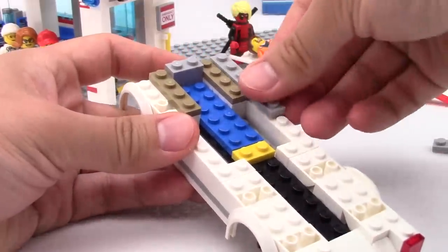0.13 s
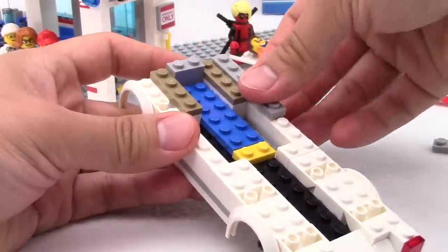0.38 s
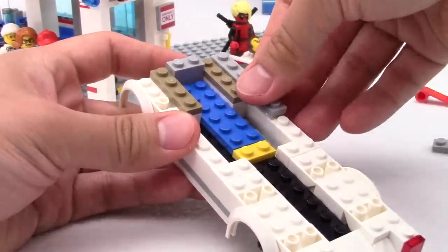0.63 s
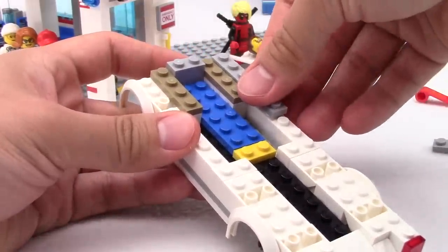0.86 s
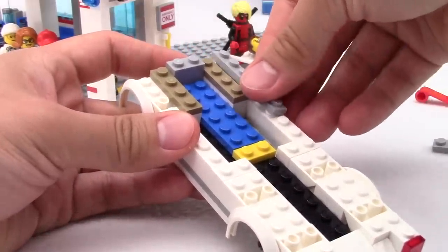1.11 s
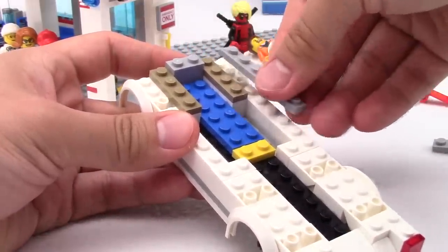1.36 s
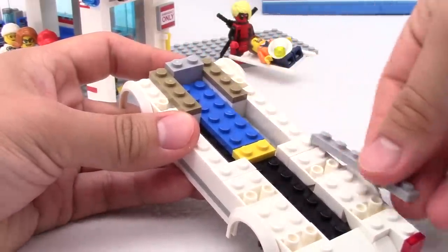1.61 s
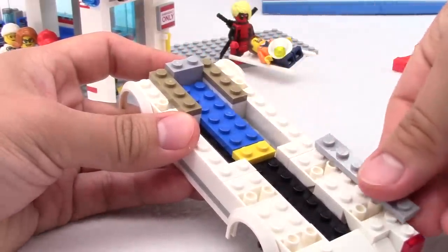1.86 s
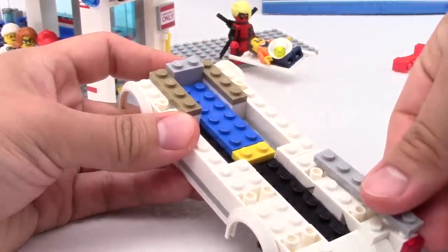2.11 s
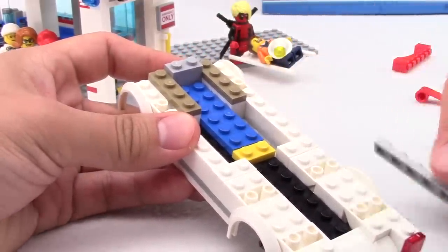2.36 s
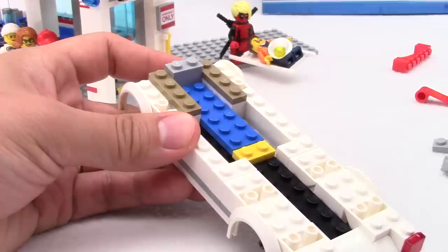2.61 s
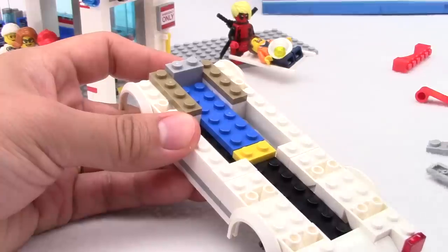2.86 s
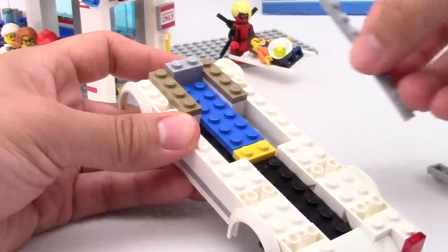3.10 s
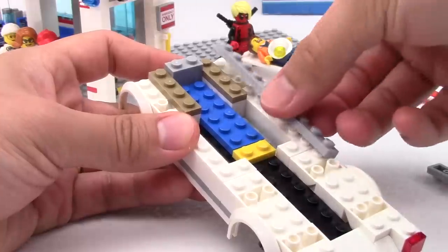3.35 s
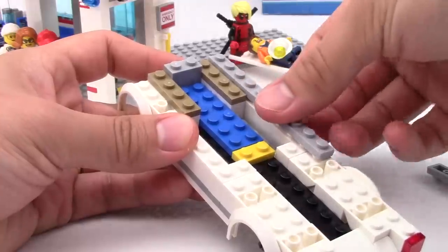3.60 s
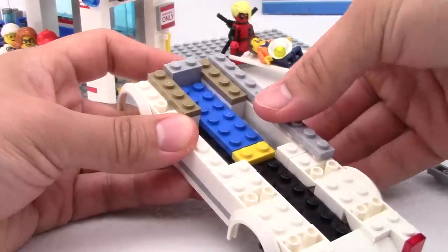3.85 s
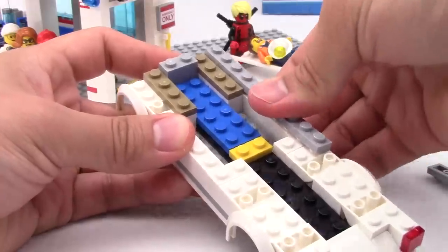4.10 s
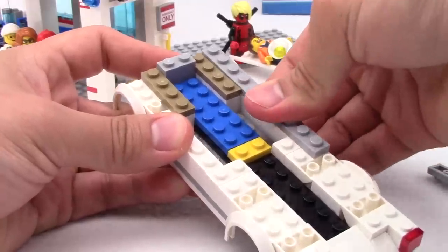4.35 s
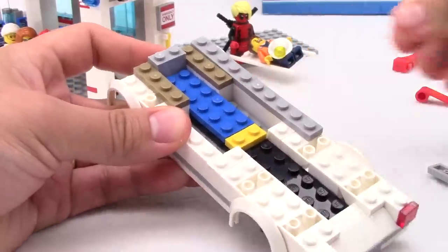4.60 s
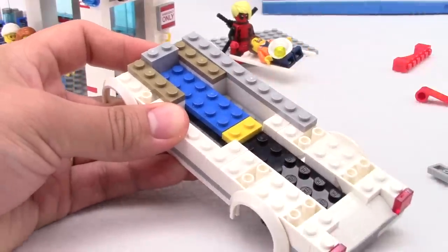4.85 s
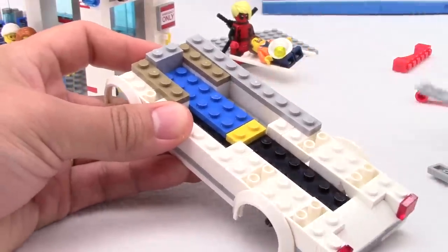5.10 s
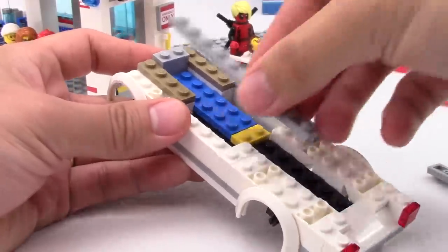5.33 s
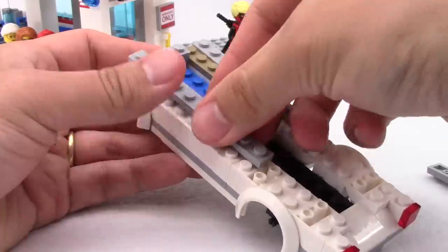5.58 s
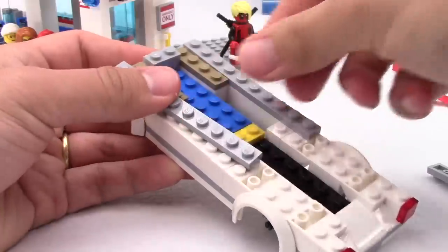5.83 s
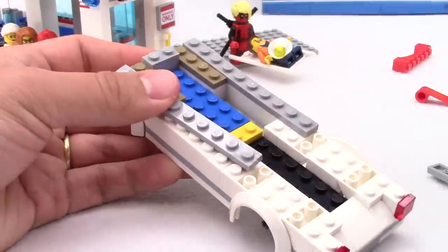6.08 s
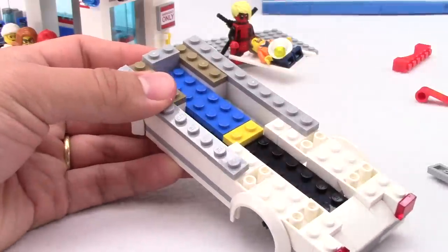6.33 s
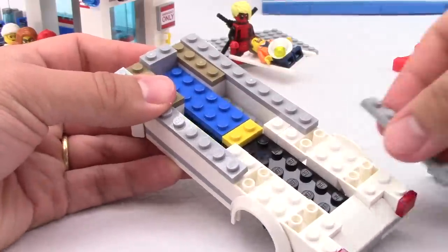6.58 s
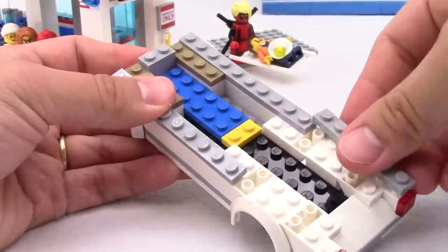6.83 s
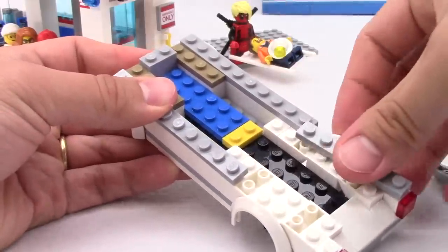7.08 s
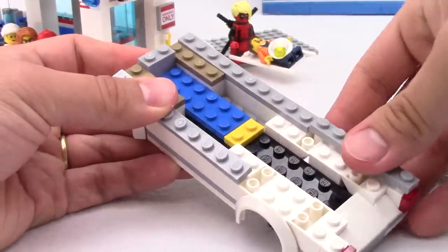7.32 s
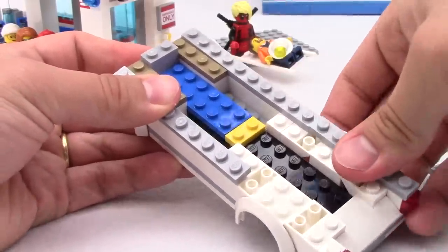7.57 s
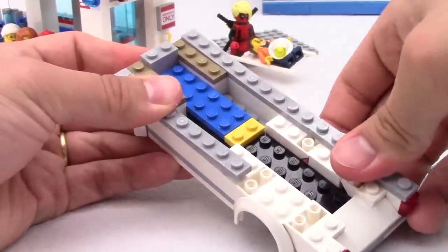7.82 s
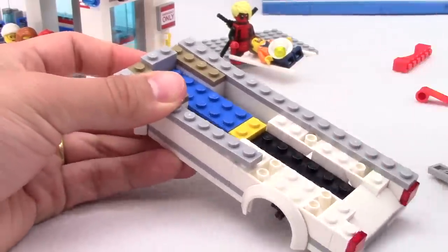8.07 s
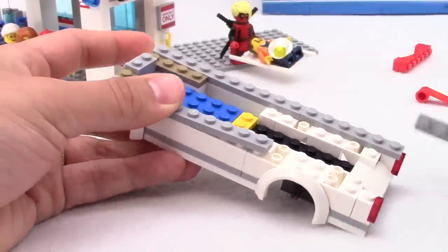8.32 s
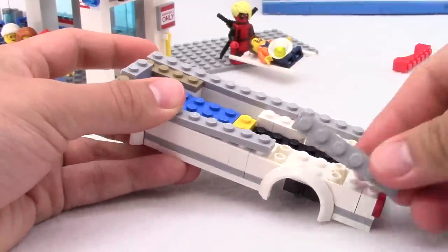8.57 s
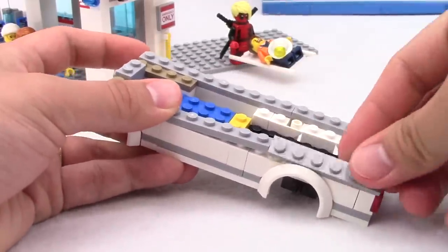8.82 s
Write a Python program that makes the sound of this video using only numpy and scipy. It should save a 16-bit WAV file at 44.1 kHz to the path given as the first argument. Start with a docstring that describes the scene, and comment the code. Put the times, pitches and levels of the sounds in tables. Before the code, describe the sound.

Close up in a quiet small room, fingers handle hard plastic toy bricks. Faint ticks and tiny scrapes come first, then a crisp snap, a louder one soon after, and a long near-silence. Later another bright snap, then a very sharp click followed by a heavier double press with a low woody thump from the table. Faint handling ends it. Low rumble and slight hiss lie underneath.

```python
"""Plastic toy bricks and plates are picked up, placed and pressed onto a model held over a table in a quiet room.
Each contact is a burst of tiny stud slips ringing the modes of the hollow plastic; some plates sing a short note.
Pushes swing softly and knock the modes of the table top, and brushing fingers are clumped grains of noise.
The room answers with a short noise tail, over low rumble and hiss made of coloured noise."""
import sys
import numpy as np
from scipy import signal
from scipy.fft import rfft, irfft
from scipy.io import wavfile
from scipy.ndimage import uniform_filter1d

SR = 44100
rng = np.random.default_rng(int(sys.argv[2]) if len(sys.argv) > 2 else 0)


def to_linear_factor(level_db):
    """Convert decibel levels (scalar or array-like) to linear amplitude factors."""
    exponent = np.asarray(level_db, float) / 20
    return 10 ** exponent


def dump(signal):
    """Clip the signal to [-1, 1] and save it as 16-bit WAV at the path in sys.argv[1]."""
    limited = np.clip(np.atleast_2d(signal).T, -1, 1)
    pcm = np.round(limited * 32767).astype(np.int16)
    wavfile.write(sys.argv[1], SR, pcm)


N = 394254

# Strokes of fingers over studs. Each row: start in seconds, length in seconds, rms level in dB, centre in Hz.
STROKES = [(0.222, 0.15, -74, 5500), (1.05, .065, -76, 4000), (1.558, .051, -68.5, 8000),
           (1.992, .088, -62, 6000), (2.241, 0.051, -66.5, 5900), (2.802, .13, -64.5, 5900),
           (4.517, 0.07, -58, 7990), (4.606, 0.21, -63.5, 5700), (4.996, 0.14, -64.5, 4505),
           (5.28, 0.058, -71.5, 5930), (5.697, .045, -57.5, 4000), (5.879, 0.099, -71.5, 6900),
           (6.69, 0.2, -72.5, 8100), (6.968, 0.059, -65.5, 8500), (7.947, 0.063, -61.5, 6004),
           (8.051, 0.19, -69, 6815), (8.199, .13, -59, 3800), (8.28, 0.16, -70, 4490),
           (8.601, 0.26, -69, 5000), (8.81, 0.15, -68.5, 4960)]


def in_time(rows):
    """A curve of (seconds, value) rows read at every sample."""
    return np.interp(np.arange(N) / SR, *np.transpose(rows))


def at_hz(points, hz):
    """A table of (Hz, value) rows read on a log-frequency axis."""
    points = np.array(points)
    return np.interp(np.log(hz), np.log(points[:, 0]), points[:, 1])


def rms_one(x):
    """Scales a sound to unit rms."""
    return x / np.sqrt(np.mean(x ** 2) + 1e-20)


def coloured(white, spectrum):
    """White noise shaped by a spectrum of (Hz, dB) rows, at unit rms."""
    hz = np.maximum(np.fft.rfftfreq(len(white), 1 / SR), 1)
    shaped = rfft(white) * to_linear_factor(at_hz(spectrum, hz))
    return rms_one(irfft(shaped, len(white)))


def add(out, sound, s):
    """Mixes a sound in at a time in seconds; whatever lies past the end is left out."""
    at = round(s * SR)
    out[at:at + len(sound)] += sound[:max(len(out) - at, 0)]


def low_rumble():
    """Rumble through floor and table: bass-heavy noise whose level drifts."""
    # Each row: time in seconds, rms level in dB.
    rumble_level = [(0, -59.5), (1.4, -57.5), (2.8, -58), (2.96, -54.5), (3.2, -60), (4.4, -58.5),
                    (4.68, -54), (4.9, -58.5), (6.7, -59), (7.3, -54.5), (8.6, -58), (8.94, -52)]
    # Each row: frequency in Hz, relative density in dB per Hz.
    rumble_colour = [(15, -13), (25, 8), (55, -4.5), (120, -8.5), (250, -17), (500, -26.5), (1000, -49.5)]
    return to_linear_factor(in_time(rumble_level)) * coloured(rng.standard_normal(N), rumble_colour)


def steady_hiss():
    """Hiss: steady noise with a treble that slopes gently down."""
    # Each row: frequency in Hz, relative level in dB.
    hiss_colour = [(180, -31.5), (300, -4.5), (1110, -6.5), (1310, -8), (1450, -9.5), (11400, -16),
                   (15200, -21), (16500, -41.5)]
    return to_linear_factor(-68) * coloured(rng.standard_normal(N), hiss_colour)   # rms level in dB


def room(x, first_s, early_t60):
    """Near reflections die fast; the diffuse tail dies band by band."""
    # Decay of the tail. Each row: frequency in Hz, t60 in seconds.
    room_decay = [(300, 0.61), (790, 0.67), (2090, 0.5), (5510, 0.55), (10000, .45), (14600, 0.23)]
    # Balance of the sound sent to the walls, used for the tail. Each row: frequency in Hz, relative level in dB.
    wall_colour = [(100, 2), (400, 4), (1000, -1), (2500, -2), (6000, -3.5), (10000, -4.5), (15000, -3)]
    tail_db, early_db = -19, -8.5   # energy of each part before the onset fade
    t = np.arange(SR * 3 // 4) / SR
    tail = np.zeros(len(t))
    edges = 45 * 2 ** np.arange(0, 9, .5)   # half-octave bands, Hz
    for low, high in zip(edges, edges[1:]):
        band_filter = signal.butter(2, [low, high], "band", fs=SR, output="sos")
        band = signal.sosfilt(band_filter, rng.standard_normal(len(t)))
        hz = np.sqrt(low * high)
        tail += band * to_linear_factor(at_hz(wall_colour, hz) - 60 * t / at_hz(room_decay, hz))
    early = rng.standard_normal(len(t)) * to_linear_factor(-60 * t / early_t60)
    echo = (to_linear_factor(tail_db) * rms_one(tail) + to_linear_factor(early_db) * rms_one(early)) / np.sqrt(len(t))
    onset = np.clip(t / first_s, 0, 1) ** 2
    return signal.fftconvolve(x, echo * onset)[:N]


def fingers(grain_db, below_db, above_db):
    """Skin dragging on plastic: dense, uneven grains in clumps that swell and fade around a centre frequency."""
    swing_db, grip_ms = 2, 9.3   # skin sticks and lets go: depth, and time for one grip
    out = np.zeros(N)
    for s, length, level_db, centre_hz in STROKES:
        grains = rng.standard_normal(12000) * to_linear_factor(grain_db * np.minimum(rng.exponential(1, 12000), 4))
        grips = np.arange(12000) * 1000 / SR / grip_ms
        clumps_db = swing_db * np.interp(grips, np.arange(100), rng.standard_normal(100))
        grains = (grains * to_linear_factor(clumps_db))[:round(length * SR)]
        # The spectrum falls with the square of the distance in octaves, at its own rate on each side.
        hump = [(centre_hz * 2. ** k, -(above_db if k > 0 else below_db) * k ** 2) for k in range(-5, 4)]
        swell = np.sqrt(2 * np.hanning(len(grains)))
        add(out, to_linear_factor(level_db) * coloured(grains, hump) * swell, s)
    return out


def table(rise_cycles):
    """A push is a soft, damped swing; its hard edge knocks the modes of the table top."""
    # Pushes into the table. Each row: start in seconds, peak in dB, push in Hz, gain of the knock in dB.
    pushes = [(.279, -52, 258, -82), (1.69, -52, 69.5, -59), (1.99, -44, 86, -64), (2.013, -37, 66, -50.5),
              (2.291, -47.5, 63, -83), (2.466, -38, 121, -63), (2.53, -50.5, 66, -70),
              (2.844, -30, 57.2, -53), (2.866, -31.5, 52.6, -54), (2.984, -41.5, 114, -69),
              (2.999, -44, 44.7, -76.5), (3.598, -45, 86.3, -51.5), (4.214, -24, 98.7, -37.5),
              (4.516, -46, 72, -72), (5.031, -43, 53.5, -75), (5.062, -48, 55, -71.5),
              (5.101, -54, 54.6, -75), (6.288, -43, 54.6, -67.5), (6.33, -42.5, 55, -68),
              (6.691, -46, 59, -65), (6.85, -50, 59, -62), (6.974, -46, 60, -63), (7.216, -39, 140, -36),
              (7.231, -34, 125, -44.5), (7.249, -43.5, 131, -37.5), (7.6092, -12.5, 135, -28.5),
              (7.6676, -14, 101.2, -37), (7.7, -38, 130, -49), (7.97, -43, 64, -77),
              (8.649, -42.5, 59.5, -63), (8.884, -39, 105, -73), (8.899, -46, 60, -60)]
    # Modes of the table top. Each row: frequency in Hz, mean level in dB, t60 in seconds.
    top_modes = [(44, -2.5, .4), (140, -9.5, 0.34), (193, 2.5, 0.067), (254, -5.5, 0.16), (390, 0.5, 0.063),
                 (532, -5.5, 0.075), (643, -4.5, .06), (850, -10, .05)]
    out, t = np.zeros(N), np.arange(16384) / SR
    for s, peak_db, push_hz, knock_db in pushes:
        # 82 ms at 100 Hz up to -41 dB; deeper pushes last longer, firm ones are held down and stop sooner.
        t60_ms = 82 * (100 / push_hz) ** 1.5 * to_linear_factor(-.42 * max(peak_db + 41, 0))
        rise = 1 - np.exp(-t * push_hz / rise_cycles)
        push = np.sin(2 * np.pi * push_hz * t) * to_linear_factor(-60 * t * 1000 / t60_ms) * rise
        knock = np.zeros(len(t))
        for hz, mode_db, t60 in top_modes:
            struck_db = mode_db + rng.normal(0, 2.5)   # every knock strikes the modes a little differently
            knock += to_linear_factor(struck_db - 60 * t / t60) * np.sin(2 * np.pi * hz * t)
        add(out, to_linear_factor(peak_db) * push / np.abs(push).max() + to_linear_factor(knock_db) * knock, s)
    return out


def plates(rise_ms, twin_db, twin_gap):
    """Touched plates and hollows sing: each note swells within a touch and dies, blurred by a close twin mode.
    Flat plates beam their notes: returns the sound towards the listener and towards the walls."""
    # Each row: start in seconds, frequency in Hz, peak before the twin in dB,
    # how freely the plate is held from 0 to 1, level sent to the walls relative to the listener in dB.
    sung_notes = [(1.2406, 7570, -48, 0.3, -3), (1.363, 2870, -45, 0.5, -5), (1.9884, 1086, -44, 0.3, -5),
                  (2.0117, 1180, -52, 0.1, -3), (2.07, 1870, -54, 0.5, -3), (2.332, 1905, -51, 0.46, -5),
                  (2.807, 3900, -52, 0.3, -3), (2.811, 6150, -45, .2, -3), (2.812, 1820, -53.5, .2, -3),
                  (2.862, 1400, -49, 0.1, -5), (3.5982, 3770, -17, 0, -5), (3.6, 407, -47.5, 0.9, -6.5),
                  (4.214, 194, -26.5, 0.81, -4.5), (4.2159, 6030, -14.5, 0, 0.5),
                  (4.218, 529, -30.5, 0.9, -4), (5.6856, 2760, -54, .2, -3),
                  (5.7136, 1030, -43.5, 0.01, -4), (5.722, 3000, -55.5, 0.7, 3),
                  (5.8872, 2810, -55.5, 0, -4.5), (6.279, 2330, -39.5, 0.7, -2.5),
                  (6.298, 970, -29, 0.1, -7.5), (6.2969, 5520, -16.5, 0.03, -2), (6.3, 2543, -21.5, 0, 2),
                  (6.7423, 1250, -54.5, 0, -6), (7.25, 3960, -17.5, 0.08, -2.5),
                  (7.611, 1374, -32, 0.14, 1), (7.61, 646, -19, 0.18, -8), (7.671, 850, -17, 0.3, -10),
                  (7.671, 1380, -21.5, 0.2, -0.5), (7.67, 2990, -26, 0.5, 1.5), (7.989, 1980, -51, .3, 3),
                  (8.7836, 3720, -27, .5, 0), (8.797, 3760, -53, 0.95, -3)]
    out, around, t = np.zeros(N), np.zeros(N), np.arange(8192) / SR
    for s, hz, peak_db, free, wall_db in sung_notes:
        # 15 ms for a gripped note of -32.5 dB; louder ones are damped sooner, a free plate rings 4.5 times as long.
        t60_ms = 15 * to_linear_factor(-.45 * (peak_db + 32.5)) * 4.5 ** np.clip(free, 0, 1)
        shape = (1 - np.exp(-t * 1000 / rise_ms)) * to_linear_factor(-60 * t * 1000 / t60_ms)
        phase, twin_phase, side = rng.random(3)
        twin_hz = hz * (1 + twin_gap * np.sign(side - .5))   # above or below by chance
        twin = to_linear_factor(twin_db) * np.sin(2 * np.pi * (twin_hz * t + twin_phase))
        tone = np.sin(2 * np.pi * (hz * t + phase)) + twin
        note = to_linear_factor(peak_db) * shape / shape.max() * tone
        add(out, note, s)
        add(around, to_linear_factor(wall_db) * note, s)
    return out, around


def ticks():
    """Brushing fingers nudge loose studs: one faint contact at a chance moment of each stroke."""
    level_db, spread_db, slip_ms = -60.5, 5, 3.4
    contacts = []
    for s, length, *_ in STROKES:
        when, pitch, size = rng.random(3)
        tick_db = level_db + spread_db * (2 * size - 1)
        contacts.append((s + length * when, tick_db, 2500 * 3 ** pitch, 0, slip_ms))
    return contacts


def bricks(favour_db, favour_width, scatter_db, slip_db):
    """Each contact: slips that start sharply and thin out, ringing all modes with a balance of its own.
    Returns the sound towards the listener and the average over all directions, which has no interference dips."""
    # Each row: start in seconds, level in dB, strongest ring in Hz,
    # brightness of high over low modes in dB, slip length in ms.
    brick_contacts = [(.1236, -47, 1510, 4, 1.3), (.1367, -51, 1550, 4, 0.91),
                      (.1619, -44.5, 2860, -4, 3.5), (.1827, -34, 6200, 7, 1.3), (.1874, -36.5, 6150, 3, 2),
                      (.2603, -49.5, 5900, 0, 1.6), (.3092, -56, 4260, 1, 6), (.469, -38.5, 6100, 16, 1.9),
                      (.572, -45.5, 5100, 6, 1.4), (.6664, -46.5, 5480, 5, 0.96),
                      (.8222, -52.5, 5870, 0, 1.4), (1.0941, -53, 3960, -2, 1.2),
                      (1.1397, -52.5, 2880, -10, 0.87), (1.2411, -30, 5200, 3, 1.4),
                      (1.3614, -24, 4140, 1, 1.88), (1.6514, -38, 6300, 9, 2.3),
                      (1.6935, -31.5, 10600, 6, 1.34), (1.9546, -47, 3880, -10, 1.5),
                      (1.9893, -23.5, 10800, 25, 0.21), (2.0133, -38, 8900, 2, 1.6),
                      (2.0149, -46, 4280, -10, 5.7), (2.0251, -45, 2500, -6, 1),
                      (2.0412, -45, 5940, -10, 3.4), (2.0725, -25, 8740, 15, 1.9),
                      (2.2659, -46.5, 2400, -1, 0.68), (2.309, -51, 6070, 6, 2.3),
                      (2.332, -35, 10300, 12, 2.1), (2.4721, -51, 1510, -13, 6),
                      (2.8045, -42, 3900, 9, 4.1), (2.81, -41.5, 3920, 24, 6.6), (2.819, -49, 6100, 3, 9.9),
                      (2.8362, -44, 3830, -1, 2.2), (2.8472, -34, 12000, 3, 3.7),
                      (2.8592, -34, 4500, 6, 2.7), (2.8635, -39.5, 1500, -2, 2.5),
                      (2.8856, -35.5, 2950, -4, 1.9), (3.0289, -43.5, 4160, -3, 0.71),
                      (3.0717, -51, 1980, -18, 3.4), (3.3226, -32, 6300, 13.5, 0.88),
                      (3.3884, -49, 7240, -1.5, 2.9), (3.4577, -48, 3050, 2.5, 0.6),
                      (3.4768, -51, 2640, -3, 2.1), (3.5073, -30, 4220, 17, 1.26),
                      (3.5965, -15.5, 5900, 14.5, 1.51), (3.5983, -8.5, 10260, 22.5, 2.7),
                      (4.2148, -0.5, 10350, 12, 1.07), (4.2195, -24.5, 6200, 3.5, 4.1),
                      (4.5078, -41.5, 2940, 5, 1.5), (4.5183, -35, 4390, 13, 1.5),
                      (5.6663, -56, 2634, 5, 5), (5.6757, -54, 3960, 0, 5), (5.6856, -42, 2970, 21, 0.85),
                      (5.7075, -50, 3980, -5, 4.2), (5.7135, -35, 2110, 2, 6.2),
                      (5.7215, -33, 6330, 6, 1.3), (5.8023, -42, 6500, 5, 2), (5.8872, -53.5, 3480, 6, 3.2),
                      (6.279, -33.5, 2330, 5, 3), (6.2864, -33.5, 3440, -0.5, 1.4),
                      (6.2977, -10, 6000, 28, 5.25), (6.3025, -22.5, 9660, -11, 2.13),
                      (6.643, -48.5, 2700, -1.5, 2.4), (6.7439, -39, 10300, 4.5, 0.55),
                      (6.7557, -49.5, 3830, -5, 3.6), (6.8193, -37, 6100, 0.5, 2.35),
                      (6.848, -37, 6270, 24.5, 0.66), (7.0277, -35, 5410, 14, 1.2),
                      (7.2135, -20.5, 8400, -1, 1.9), (7.2161, 1, 9930, 28.5, 1.52),
                      (7.227, -20.5, 8400, 10.5, 3.1), (7.2306, -15.5, 6450, 7.5, 0.97),
                      (7.2345, -17.5, 6400, 12, 3.8), (7.2503, -9.5, 8040, 27.5, 1.6),
                      (7.2535, -20, 4000, 8.5, 1.7), (7.5874, -53, 2330, -15, 4.7),
                      (7.6016, -34, 4770, -17, 2.2), (7.6104, -17, 10080, 11, 2.44),
                      (7.618, -33, 1697, -18, 2.5), (7.6707, -14.5, 11800, 6, 4.06),
                      (7.968, -41, 3870, 10, 2.1), (7.9775, -44, 9160, 15, 4.9),
                      (7.9844, -40.5, 5260, -13, 2.3), (7.989, -44, 2005, -1, 4.1),
                      (8.1843, -55, 8560, 6, 1.5), (8.6603, -41, 4530, 4, 0.4), (8.7268, -53, 1510, 4, 1.9),
                      (8.7836, -32, 11400, 7, 5.3), (8.797, -43, 3800, -11, 2.2),
                      (8.8485, -49, 3680, 1, 1.3), (8.8842, -41.5, 1510, 3, 1.4),
                      (8.8992, -47, 7250, 1, 2.2)]
    # Modes of the brick model. Each row: frequency in Hz, level before each contact's balance in dB, t60 in ms.
    brick_modes = [(764, -11, 8), (994, -6.5, 36), (1250, 0, 12), (1510, 5, 9.1), (1980, 0.5, 14),
                   (2330, 0, 6.1), (2684, -3, 13), (3000, -4, 8.5), (3400, -7, 9), (3900, -1.5, 5.3),
                   (4540, -5, 8), (5170, -4.5, 6.5), (5700, -3.5, 6.1), (6190, -2.5, 5.3), (6510, -1.5, 7),
                   (7480, 3.5, 3), (8400, 1, 5.5), (9050, 2, 4.6), (10270, 2.5, 6.4), (11070, 0, 5),
                   (12090, -1.5, 8.4), (13280, -11.5, 5), (13060, -5.5, 14), (14500, -5.5, 4.9),
                   (15100, -3, 2.6), (15900, -5, 3)]
    out, around, t = np.zeros(N), np.zeros(N), np.arange(1024) / SR
    hz, mode_db, t60_ms = np.transpose(brick_modes)
    rings = np.sin(2 * np.pi * hz[:, None] * t) * to_linear_factor(-60 * t * 1000 / t60_ms[:, None])
    powers = np.abs(rfft(rings)) ** 2
    signs = (-1) ** np.arange(len(hz))
    for s, level_db, ring_hz, bright_db, slip_ms in brick_contacts + ticks():
        # Brightness weakens the low modes by its share and lifts the high ones by the rest.
        narrowing_db = .1 * max(-29.5 - level_db, 0)   # light touches wake the far modes less
        low_db = -11 - .6 * bright_db - narrowing_db
        high_db = -10 + (1 - .6) * bright_db - narrowing_db
        tilt_db = at_hz([(1600, low_db), (3500, 0.0012), (6000, 0), (10000, high_db)], hz)
        # The place where the plate is held favours the modes near one ring.
        near_db = favour_db * np.exp(-.5 * (np.log(hz / ring_hz) / favour_width) ** 2)
        gains = to_linear_factor(mode_db + tilt_db + near_db + scatter_db * rng.standard_normal(len(hz)))

        slips = rng.choice([-1, 1], 600) * to_linear_factor(slip_db * np.minimum(rng.exponential(1, 600), 3))
        slips *= np.exp(-(t[:600] * 1000 / max(slip_ms, .1)) ** 3)
        # Each mode keeps its share of the energy, whatever the spectrum of the slips.
        slip_power = np.abs(rfft(slips, len(t))) ** 2
        drive = np.sqrt(powers @ slip_power / powers.sum(axis=1))
        click = signal.fftconvolve(slips, (gains / drive * signs) @ rings)
        loudest_ms = uniform_filter1d(click ** 2, size=44).max()   # power over the loudest millisecond
        click *= to_linear_factor(level_db) / np.sqrt(2 * loudest_ms)

        # The favoured ring is beamed: a share of its lead in dB is lost on the walls.
        spread = gains * to_linear_factor(-.45 * near_db)
        smooth_spectrum = np.sqrt(uniform_filter1d(spread ** 2 @ powers, size=10))
        pulse = np.roll(irfft(smooth_spectrum), 128)[:512]   # centred on sample 128
        pulse *= np.linalg.norm(click) / np.linalg.norm(pulse)   # same energy as the click
        add(out, click, s - .0004)
        add(around, pulse, s + slip_ms / 2000 - 128 / SR)   # centred halfway through the slip length
    return out, around


def scene():
    """Hands at the table, the room around them."""
    background = low_rumble() + steady_hiss()
    hands = table(rise_cycles=.6) + fingers(grain_db=3.0, below_db=0.5, above_db=2.5)
    notes, notes_around = plates(rise_ms=.8, twin_db=-8.0, twin_gap=0.046)
    clicks, clicks_around = bricks(favour_db=10.0, favour_width=.07, scatter_db=1.5, slip_db=5.5)
    walls = clicks_around + hands + notes_around
    echoes = room(walls, first_s=0.0029, early_t60=0.034)
    return (clicks + notes + hands + echoes + background)[None]


def top_cut(x):
    """Nothing passes above the cut-off."""
    return signal.sosfilt(signal.butter(12, 16830, fs=SR, output="sos"), x)


def record(dry):
    """The loudest snaps are rounded near full scale; deep bass and the top are cut."""
    rounded = dry / (1 + np.abs(dry / .97) ** 4) ** .25
    low_cut = signal.sosfilt(signal.butter(2, 22, "high", fs=SR, output="sos"), rounded)
    finished = signal.sosfilt(signal.cheby2(10, 60, 16900, fs=SR, output="sos"), low_cut)
    return top_cut(finished)


dry = scene()
out = record(dry)
dump(out)
```